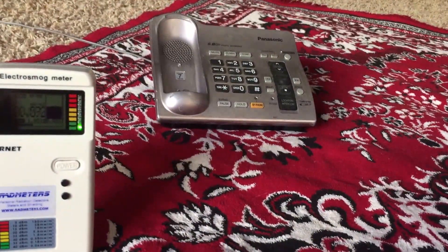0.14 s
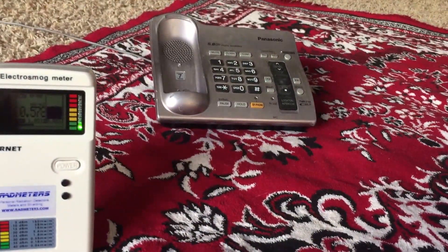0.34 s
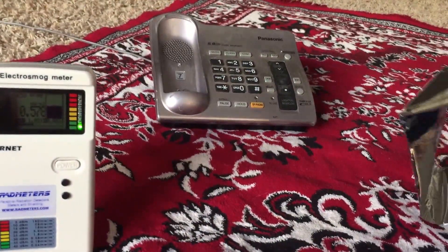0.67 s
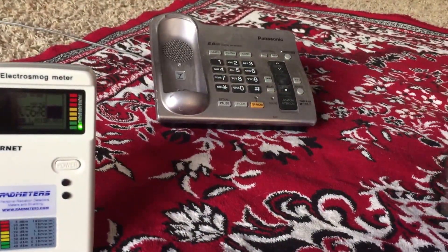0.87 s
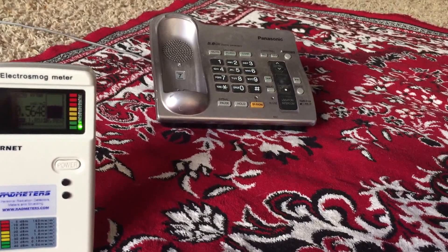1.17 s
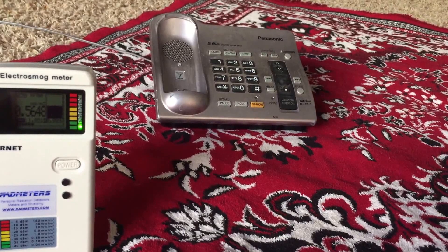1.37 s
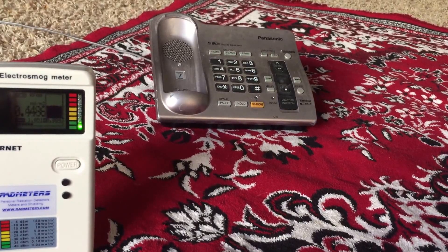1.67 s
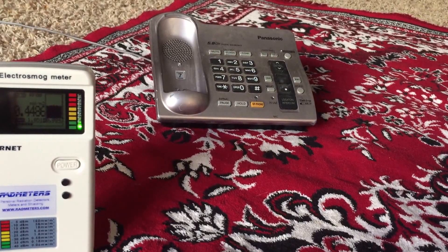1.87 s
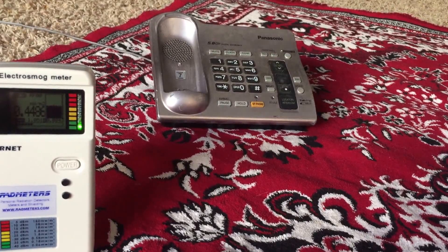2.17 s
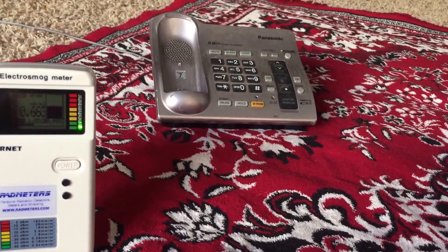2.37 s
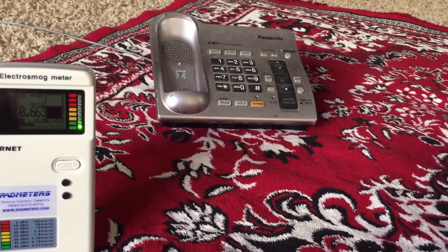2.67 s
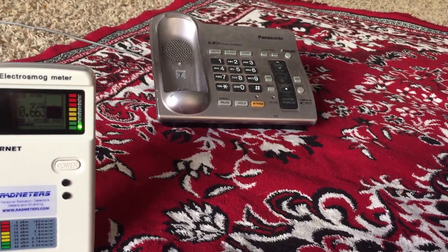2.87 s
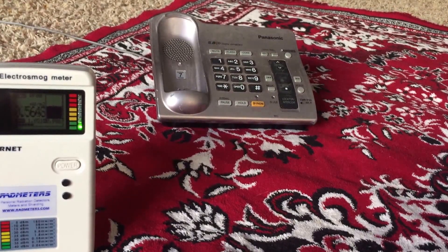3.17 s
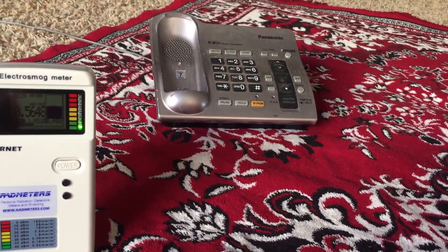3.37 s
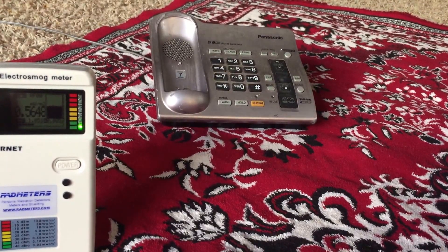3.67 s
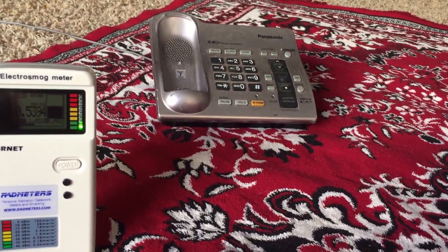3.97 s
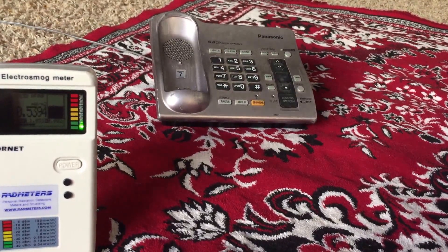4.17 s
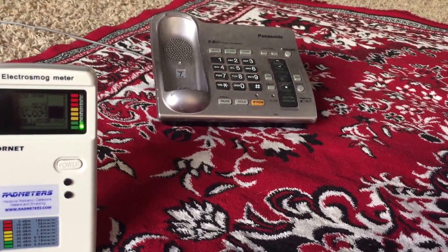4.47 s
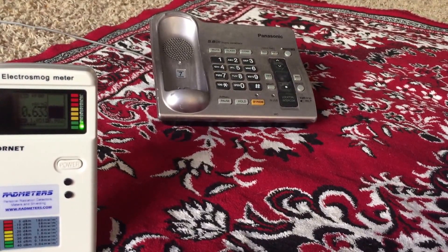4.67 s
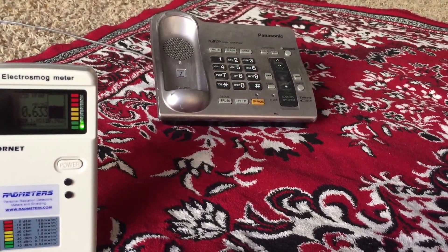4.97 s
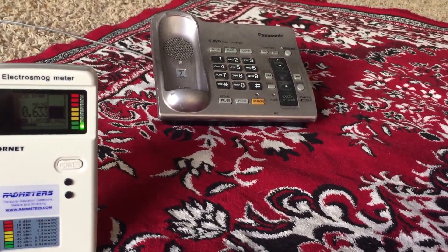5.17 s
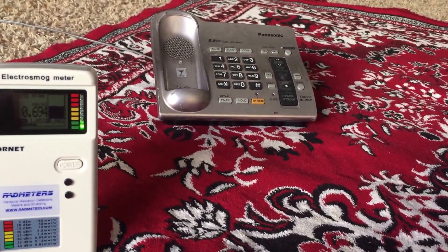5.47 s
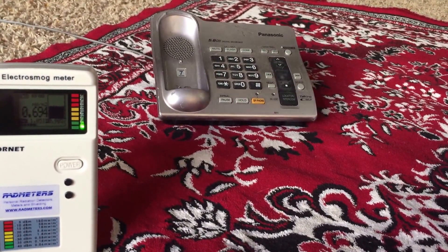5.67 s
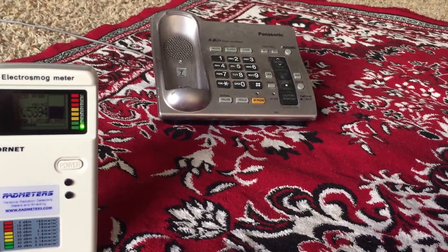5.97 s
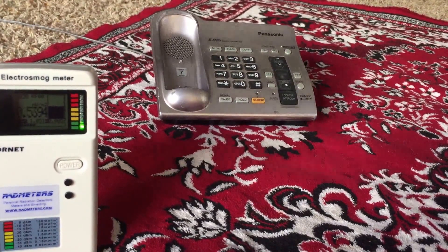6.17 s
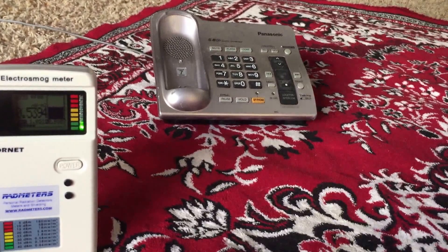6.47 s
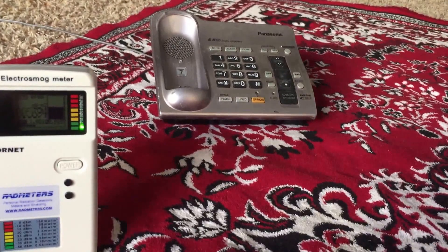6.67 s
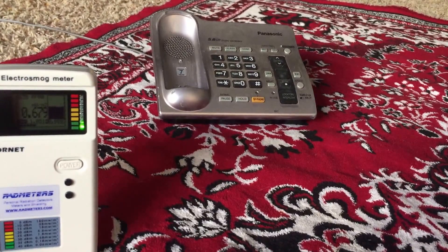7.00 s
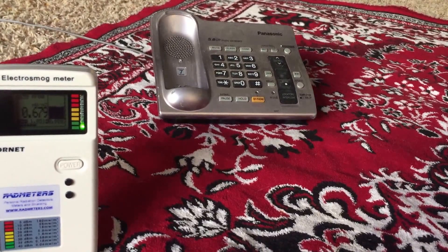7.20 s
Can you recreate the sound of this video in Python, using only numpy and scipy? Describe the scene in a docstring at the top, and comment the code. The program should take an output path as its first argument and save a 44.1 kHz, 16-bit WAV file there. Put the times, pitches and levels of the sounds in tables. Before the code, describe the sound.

Crisp, dry crackle from a foil-like plastic blanket being spread out nearby. Thousands of tiny clicks mix low fold pops, sharp mid-pitched crease snaps and fine high wrinkle fizz. Handling starts sparse, surges at about one second, peaks past the middle and late, and never fully stops. Low flutters of air and dull soft thumps lie beneath, in a small indoor room with faint hum and hiss.

```python
"""A thin metallised plastic blanket is unfolded by hand in a carpeted room, beside a small microphone.
It starts with light, bright rustling and single snaps, then the tugs come in stronger swells.
Thousands of tiny bursts make the crackle: wide folds click low, creases near 2 kHz, fine wrinkles high.
The handling is loudest near 3.6 s and 6 s; soft low thumps follow just before 6 s and 7 s.
All along, the sheet swings, wobbles low and pushes air, over a faint room hum and hiss of filtered noise."""
import sys
import numpy as np
from scipy import signal
from scipy.fft import rfft, irfft, next_fast_len
from scipy.io import wavfile
from scipy.ndimage import uniform_filter1d, map_coordinates

SR = 44100
rng = np.random.default_rng(int(sys.argv[2]) if len(sys.argv) > 2 else 0)


def boost(x):
    """Linear amplitude factor 10**(x/20) for a level x in decibels (scalar or array-like)."""
    u = np.asarray(x, float) / 20
    return 10 ** u


def inscribe(sig):
    """Save sig as 16-bit PCM at rate SR to the path in sys.argv[1].

    A 1-D sig is mono; a 2-D sig holds one channel per row.
    Samples are clipped to [-1, 1] before scaling.
    """
    pcm = np.round(np.clip(np.atleast_2d(sig).T, -1, 1) * 32767)
    wavfile.write(sys.argv[1], SR, pcm.astype(np.int16))


N = 323694  # length in samples, about 7.3 s


def along(points, hz):
    """Reads a curve of (pitch_hz, value) points, with pitch on a log axis."""
    point_hz, value = np.transpose(points)
    return np.interp(np.log(hz + 1), np.log(point_hz + 1), value)


def unit(x):
    """Scales a sound to an rms level of 1."""
    return x / np.sqrt(np.mean(x ** 2, -1, keepdims=True) + 1e-20)


def curves(rows):
    """Joins table rows by straight lines: one value per sample for each column after the time."""
    time_s, *columns = np.transpose(rows)
    return [np.interp(np.arange(N) / SR, time_s, column) for column in columns]


def wobble(rate):
    """A smooth random curve through rate random values a second (at most 400)."""
    return map_coordinates(rng.standard_normal(N // 100), [np.arange(N) * min(rate, 400) / SR])


def filtered(x, response):
    """Multiplies the spectrum of x by a gain that depends on frequency."""
    size = next_fast_len(N + SR // 2)
    gain = response(np.fft.rfftfreq(size, 1 / SR))
    return irfft(rfft(x, size) * gain, size)[..., :N]


def above(f, hz):
    """Gain of a steep high-pass filter."""
    return 1 / np.sqrt(1 + (hz / (f + 1)) ** 8)


def pops(start_s, hz, energy_db, t60_s, sharpness, size):
    """Short noise bursts that swell and die, each through its own resonance (sharpness = pitch / width)."""
    t = np.arange(size) / SR
    f = np.fft.rfftfreq(size, 1 / SR)
    age = t / t60_s[:, None]
    burst = rng.standard_normal((len(start_s), size)) * boost(-60 * age)
    burst *= t < t[size // 2]  # the second half is left free for the ringing
    burst *= 1 - np.exp(-age / .04)  # a quick but soft start
    centre = hz[:, None]
    ring = 1j * f * centre / (centre * centre - f * f + 1j * f * centre / sharpness)
    pop = irfft(rfft(burst) * ring, size)
    pop *= boost(energy_db)[:, None] / np.linalg.norm(pop, axis=1, keepdims=True)
    where = np.round(start_s * SR).astype(int)[:, None] + np.arange(size)
    return np.bincount(where.ravel(), pop.ravel(), N + size)[:N]


def crackle(count, low_hz, high_hz, spread_db, most_db, t60_s, sharpness, size):
    """Film buckles at random moments and pitches; few bursts come near most_db (below 0 if spread_db is)."""
    when, pitch, big, life = rng.random((count, 4)).T
    hz = low_hz * (high_hz / low_hz) ** pitch
    energy_db = most_db * np.tanh(-spread_db * np.log(1 - big) / most_db)
    x = pops(when * (N - 1) / SR, hz, energy_db, t60_s * (.5 + life), sharpness, size)
    return unit(filtered(x, np.sqrt))  # pitches spread evenly per octave, levelled per Hz


def bursts(top_s, db, rise_ms, fall_ms):
    """Summed power of swells that are 10 dB down rise_ms before and fall_ms after their top."""
    coarse = np.arange(0, N, 32)  # worked out at every 32nd sample
    late_ms = 1000 * (coarse / SR - top_s[:, None])
    span_ms = np.where(late_ms < 0, rise_ms[:, None], fall_ms[:, None])
    away = np.abs(late_ms) / np.maximum(span_ms, 8)
    level_db = db[:, None] - 10 * away ** 1.5  # rounded top, steepening flanks
    power = np.sum(boost(level_db) ** 2, 0)
    return np.interp(np.arange(N), coarse, power)


def blanket():
    """Film buckles in clumps of crackle over a sliding hiss; folds, creases and wrinkles take their turns."""
    # colour of the crackle at the microphone: pitch_hz, level_db (per Hz, relative)
    foil_colour = [(250, -22), (420, -10.5), (503, -17), (918, -5.5), (1510, -7.5), (2070, -4.5),
                   (2300, -3), (2550, -3.5), (4880, -6.5), (5500, -5), (8900, -7), (10500, -8),
                   (13800, -10.5), (15300, -11.5)]
    # a narrow rustle that stands out when the handling is light: time_s, level_db (over creases)
    narrow_level = [(0, -9), (.6, -2.5), (1.8, -7), (2.4, -14), (2.65, 0.5), (2.95, -1), (3.2, -11.5),
                    (4.1, -12.5), (5.1, -22), (6, -8), (7.34, -13)]
    fold_top_hz, wrinkle_low_hz = 1600, 3600  # borders between folds, creases and wrinkles
    narrow_hz, narrow_width_hz = 1988, 270

    bright_gain, wide_gain, wrinkle_db = effort()
    wrinkle_db = wrinkle_db + 0.15 * wobble(8.9)  # the balance of sizes never rests
    clumps_db = 0.47 * wobble(22) + 0.95 * wobble(70)

    ticks = crackle(count=1800, low_hz=1000, high_hz=14200, spread_db=1.2, most_db=8,
                    t60_s=0.005, sharpness=0.4, size=256)
    big = crackle(count=7000, low_hz=447, high_hz=4310, spread_db=.9, most_db=7,
                  t60_s=0.012, sharpness=1.8, size=512)
    big += boost(-4) * rng.standard_normal(N) + boost(-1) * ticks  # noise: the sliding hiss
    small = crackle(count=14000, low_hz=3080, high_hz=16400, spread_db=.8, most_db=5,
                    t60_s=0.006, sharpness=1.9, size=256)
    small += boost(-1) * rng.standard_normal(N) + boost(-1) * ticks

    def band(x, low_hz, high_hz):
        """One range of pitches in the colour of the film."""
        def response(f):
            below = np.sqrt(1 - above(f, high_hz) ** 2)
            return boost(along(foil_colour, f)) * above(f, low_hz) * below
        return filtered(x, response)

    folds = unit(band(big, 1, fold_top_hz) * boost(clumps_db + 1.35 * wobble(40)))
    creases = unit(band(big, fold_top_hz, wrinkle_low_hz) * boost(clumps_db + .5 * wobble(30)))
    wrinkles = unit(band(small, wrinkle_low_hz, SR) * boost(clumps_db + 0.27 * wobble(27)))
    narrow_db, = curves(narrow_level)
    narrow = unit(filtered(small, lambda f: 1 / (1 + (2 * (f - narrow_hz) / narrow_width_hz) ** 2)))

    bright = creases + boost(narrow_db) * narrow + boost(wrinkle_db) * wrinkles
    share = np.sqrt(1 + boost(wrinkle_db) ** 2)  # creases and wrinkles divide the effort between them
    return (bright_gain * bright + wide_gain * folds) / share


def effort():
    """Harder handling buckles more film: gains of creases with wrinkles and of folds, and wrinkle dB."""
    # steady handling: time_s, crackle_db, wide_folds_db (over creases), fine_wrinkles_db (over creases)
    steady_hands = [(0.0, -50.5, -4, 10), (0.11, -55, -10, 5.5), (0.15, -70.5, -7, -1), (0.36, -67, -11, 4),
                    (0.46, -59, 7.5, 4.5), (0.66, -65, -10, 3.5), (1.05, -58, 1, 4),
                    (1.45, -51.5, -10, 4.5), (1.9, -51.5, -12, 3.5), (2.19, -51, -5, 4.5),
                    (2.55, -51.5, -12, 5.5), (2.67, -63, -16, 6), (2.96, -57.5, -16, 5.5),
                    (3.02, -52, -1, 7), (3.38, -46, -6, 1.5), (3.5, -37.5, -7, 6), (4.07, -44, -17, 4.5),
                    (4.27, -47, -24, 3.5), (4.57, -54.5, -10, 3.5), (5.3, -48.5, -7, 2.5),
                    (5.7, -47, -8, 6), (6.2, -53, -7, 5.5), (6.46, -52.5, -8, 5), (6.92, -55, -8, 6.5),
                    (7.34, -53, -5, 3.5)]
    # single tugs, each a burst of crumpling that builds up and lets go:
    # top_s, crackle_db, rise_ms (the last 10 dB), fall_ms (the first 10 dB), wide_folds_db (over creases)
    tugs = [(0.315, -61.5, 50, 20, -8), (0.387, -54.5, 63, 10, -7), (0.447, -49, 66, 277, -11),
            (0.583, -49, 84, 16, -1.5), (0.694, -54.5, 14, 99, -3), (0.78, -45.5, 23, 44, -3.5),
            (0.885, -44, 51, 246, -6.5), (0.985, -34.5, 100, 21, -9.5), (1.24, -43.5, 116, 98, -4),
            (1.345, -47, 50, 150, 1), (1.626, -46.5, 169.5, 47, -1.5), (1.721, -47, 11, 18, -3),
            (1.86, -47, 200, 132, -3.5), (2.035, -38, 98, 65, -1), (2.326, -41, 91, 85, -2),
            (2.454, -43.5, 22, 34, -9), (2.594, -49, 15, 47, -4.5), (2.727, -47, 82, 47, -8.5),
            (2.82, -49, 33, 64, -7), (2.97, -56.5, 57, 307, -4), (3.076, -44.5, 65, 77, -16),
            (3.317, -42, 220, 29, -4), (3.532, -41.5, 10, 16, 3.5), (3.628, -32, 65, 159, -6),
            (3.957, -37.5, 233, 113, -3), (4.214, -42, 403, 31, -9), (4.397, -41, 117, 60, -6.5),
            (4.53, -53, 105, 16, -2), (4.638, -47.5, 49, 44, -14), (4.714, -41.5, 34, 71, -11),
            (4.791, -44.5, 37, 193, -8.5), (5.009, -46.5, 96, 33, -3.5), (5.097, -48.5, 24, 400, -19.5),
            (5.205, -47, 26, 22, -15), (5.372, -38, 37, 52, -10), (5.555, -41.5, 163, 36, -7.5),
            (5.623, -40, 29, 54, 0.5), (5.887, -34, 330, 45, -11), (6.005, -33, 219, 46, -3.5),
            (6.179, -38, 296, 40, -3), (6.22, -42.5, 254, 270, -4), (6.403, -38, 28, 21, 2),
            (6.544, -47, 26, 148, -3.5), (6.609, -41, 15, 29, -10), (6.711, -45, 94, 163, -8),
            (6.968, -40, 18, 190, -12), (7.149, -43, 73, 74, -5), (7.289, -45.5, 105, 100, -7)]
    steady_db, fold_db, wrinkle_db = curves(steady_hands)
    top_s, tug_db, rise_ms, fall_ms, tug_fold_db = np.transpose(tugs)
    bright_power = boost(steady_db) ** 2 + bursts(top_s, tug_db, rise_ms, fall_ms)
    wide_power = boost(steady_db + fold_db) ** 2 + bursts(top_s, tug_db + tug_fold_db, rise_ms, fall_ms)
    return np.sqrt(bright_power), np.sqrt(wide_power), wrinkle_db


def patchy(x, depth_db, bins, frames):
    """The colour drifts in patches of pitch and time as other parts of the sheet are handled."""
    spectrum = signal.stft(x, nperseg=512)[2]
    field = rng.standard_normal(spectrum.shape)
    field = uniform_filter1d(uniform_filter1d(field, bins, 0), frames, 1)
    return signal.istft(spectrum * boost(depth_db * field / field.std()), nperseg=512)[1][:N]


def snaps():
    """A big crease pops over: a short ring of the fold and a bright spray from the wrinkles around it."""
    # single snaps that stand out: start_s, ring_hz, ring_energy_db, spray_hz, spray_energy_db
    snap_list = [(.105, 2500, -29, 11000, -26), (.231, 2500, -51, 6000, -33), (.25, 2650, -29, 12100, -28),
                 (.302, 2580, -30.5, 9050, -33), (.383, 1660, -23, 8950, -22),
                 (0.418, 2800, -39, 6400, -22), (.438, 2550, -24, 6200, -24), (0.542, 1740, -22, 9310, -25),
                 (.577, 1730, -9.5, 4090, -34), (0.585, 1870, -16, 4500, -38),
                 (.704, 1750, -22.5, 6070, -35), (0.778, 1980, -22, 4480, -21),
                 (.856, 2090, -28.5, 7990, -23), (.939, 1980, -15, 5450, -18), (.953, 1990, -14, 5000, -24),
                 (.961, 1900, -10.5, 4500, -24), (.979, 2110, -13, 5500, -27), (.991, 2200, -16, 6500, -19),
                 (1.0, 2000, -27, 4500, -31), (1.172, 1900, -24, 4500, -28), (1.238, 1400, -17, 5000, -28),
                 (2.119, 2000, -26, 5000, -27), (1.995, 2000, -18, 5000, -19),
                 (2.018, 2030, -18, 5000, -21), (2.032, 1980, -19, 5000, -17),
                 (2.049, 1800, -23, 5000, -27), (2.058, 1050, -15.5, 4500, -26),
                 (3.631, 2000, -13, 4300, -14), (3.639, 2110, -12, 4500, -16),
                 (3.675, 2020, -15, 4500, -22), (3.769, 2150, -25, 4000, -24),
                 (3.908, 2080, -12.5, 5000, -22), (3.935, 2900, -15, 4500, -24),
                 (6.022, 2300, -13, 5000, -24), (1.067, 2970, -24, 5500, -13),
                 (1.211, 2010, -37, 7090, -13), (1.297, 2090, -15, 4420, -32),
                 (1.412, 2040, -20.5, 8550, -20), (1.584, 1200, -17, 4450, -23.5),
                 (1.613, 2670, -15.5, 6550, -26), (1.727, 2500, -29, 5650, -25),
                 (1.717, 1880, -33, 5600, -17), (1.79, 3180, -17, 6430, -28), (1.835, 1880, -16, 4580, -35),
                 (2.308, 3440, -13, 8810, -21), (2.326, 2400, -14, 5000, -35),
                 (2.722, 2020, -29, 5670, -24), (3.071, 3480, -30, 8000, -15),
                 (3.106, 2900, -21, 5840, -26), (3.192, 1980, -20, 8900, -4.5),
                 (3.223, 2000, -28, 5670, -25), (3.315, 2050, -16, 7000, -14),
                 (3.371, 2010, -22, 6140, -26), (3.523, 1240, -23, 5800, -18),
                 (3.564, 2990, -25, 5100, -17), (3.582, 1780, -13, 6180, -23),
                 (4.203, 2930, -14, 5180, -31), (4.386, 2480, -13.5, 4080, -30),
                 (4.516, 3000, -33, 5500, -21), (4.693, 1350, -26, 5880, -21),
                 (5.358, 2240, -13, 6000, -24), (5.618, 2470, -15, 4230, -18), (5.986, 1950, -5, 5910, -22),
                 (5.996, 2980, -20, 5000, -21), (6.113, 2020, -11.5, 5500, -14),
                 (6.178, 2500, -11, 8000, -10), (6.163, 2500, -17, 13200, -14),
                 (6.244, 1740, -12.5, 6290, -23), (6.299, 2030, -19, 5210, -32),
                 (6.381, 1070, -22, 4050, -25), (6.41, 2200, -17, 3600, -19), (6.441, 1910, -21, 5560, -20),
                 (6.529, 1360, -23.5, 8570, -24), (6.598, 1900, -20, 8850, -16),
                 (6.623, 2200, -20, 6000, -20), (6.72, 2290, -28, 11200, -17), (6.95, 3090, -20, 5410, -30),
                 (7.276, 2820, -21, 5730, -17)]
    start_s, ring_hz, ring_db, spray_hz, spray_db = np.transpose(snap_list)
    even = np.ones(len(start_s))
    ring = pops(start_s, ring_hz, ring_db, .016 * even, sharpness=3.2, size=1024)
    spray = pops(start_s, spray_hz, spray_db, .008 * even, sharpness=1.1, size=1024)
    return ring + spray


def flapping():
    """Broad areas of film push air and wobble at low pitches for a few cycles."""
    # big swings of the whole sheet: top_s, air_push_db, film_wobble_db, span_ms (for 10 dB up and down)
    swings = [(0.11, -66.5, -69, 47), (0.58, -61, -65, 62), (0.79, -64, -81, 59), (0.94, -68, -55, 77),
              (1.26, -71.5, -87, 222), (1.5, -69, -62, 50), (2.05, -75, -63, 32), (2.45, -75, -65.5, 120),
              (3.27, -71, -67, 300), (3.54, -69, -58.0, 52), (3.76, -74, -56, 250), (4.2, -78.5, -56.5, 25),
              (4.34, -73, -69, 300), (4.99, -64, -65, 50), (5.44, -68, -71, 204), (5.95, -64, -51, 202),
              (6.38, -74, -58.5, 201), (6.78, -68, -59, 80), (7.0, -69, -60, 63), (7.15, -75, -62, 150)]
    # colour of pushes and wobbles: pitch_hz, level_db (per Hz, relative)
    flap_colour = [(16, -44), (28, -21), (54, -7), (102, 1.5), (308, -2), (337, -4), (495, -19.5),
                   (600, -12.5), (780, -28), (1320, -120)]
    push_db, push_waver_db = -72, 4  # the air stirs a little all the time
    wobble_db, wobble_waver_db = -69, 1.5  # film wobble at ordinary effort
    ordinary_db = -45  # crackle of ordinary effort
    growth = 0.76  # dB of wobble for each dB of effort

    top_s, swing_push_db, swing_wobble_db, span_ms = np.transpose(swings)
    relative_effort = effort()[0] / boost(ordinary_db)
    follow = boost(wobble_db + wobble_waver_db * wobble(9)) * relative_effort ** growth
    stir = boost(push_db + push_waver_db * wobble(5))
    push_gain = np.sqrt(stir ** 2 + bursts(top_s, swing_push_db, span_ms, span_ms))
    wobble_gain = np.sqrt(follow ** 2 + bursts(top_s, swing_wobble_db, span_ms, span_ms))

    def colour(f):
        return boost(along(flap_colour, f))

    def deep(f):
        return 1 / np.sqrt(1 + (f / 88) ** 6)  # air pushes lie below about 88 Hz, wobbles above

    # low bursts of nearly equal size
    film = crackle(count=900, low_hz=33.74, high_hz=615, spread_db=-1.0, most_db=1.0,
                   t60_s=0.094, sharpness=11.7, size=8192)
    film += boost(1.0) * rng.standard_normal(N)
    pushes = unit(filtered(film, lambda f: colour(f) * deep(f)))
    wobbles = unit(filtered(film, lambda f: colour(f) * np.sqrt(1 - deep(f) ** 2)))
    return push_gain * pushes + wobble_gain * wobbles


def thuds():
    """A soft contact: a few cycles of one low resonance."""
    # dull low thumps: start_s, pitch_hz, energy_db
    thump_list = [(5.86, 65, -19), (5.96, 90, -23), (6.76, 60, -22), (6.83, 60, -21)]
    start_s, hz, energy_db = np.transpose(thump_list)
    return pops(start_s, hz, energy_db, .03 * np.ones(len(start_s)), sharpness=3, size=8192)


def bounce(x):
    """One early reflection, duller than the direct sound; its delay follows the sheet."""
    # a hard surface close by answers as the sheet moves: time_s, delay_ms, level_db
    reflection = [(0, 1.14, -13.5), (2.3, 1.08, -12.5), (3.0, 1.01, -13.5), (3.8, 1.03, -18),
                  (4.4, .95, -22), (5.9, 0.876, -19.5), (6.6, 0.77, -19), (7.34, 0.69, -16)]
    delay_ms, level_db = curves(reflection)
    dull = filtered(x, lambda f: 1 / np.sqrt(1 + (f / 7000) ** 4))
    return boost(level_db) * map_coordinates(dull, [np.arange(N) - delay_ms * SR / 1000])


def room(x, count):
    """Each frequency dies at its own speed; the answer changes as the sheet moves about the room."""
    # how long the room rings: pitch_hz, t60_s (time to fall by 60 dB)
    ringing = [(500, 0.082), (3000, 0.19), (12000, 0.63)]
    hz, t, noise = signal.stft(rng.standard_normal((count, SR // 3)), SR, nperseg=256)
    decay = boost(-60 * t / along(ringing, hz)[:, None])
    tails = signal.istft(noise * decay, SR, nperseg=256)[1]
    wet = np.zeros(N + SR)
    for piece, tail in zip(np.array_split(np.arange(N), count), tails):
        answer = signal.fftconvolve(x[piece], tail / np.linalg.norm(tail))
        wet[piece[0] + 200:][:len(answer)] += answer  # the first wall answers after about 4.5 ms
    return wet[:N]


def room_hum():
    """Noise in narrow low bands makes an unsteady hum."""
    # the bands of the hum: pitch_hz, width_hz, level_db (relative)
    hum_bands = [(94.4, 4.8, 0), (115.3, 7.8, -13), (193, 19, 2.5)]

    def response(f):
        return sum(boost(db) / (1 + (2 * (f - hz) / width_hz) ** 2) for hz, width_hz, db in hum_bands)
    return boost(-75.0) * unit(filtered(rng.standard_normal(N), response))


def air_hiss():
    """Air in the room: steady noise with a fixed colour."""
    # colour of the air: pitch_hz, level_db (per Hz, relative)
    air_colour = [(250, -28), (450, -1), (900, -8), (2000, -10), (4000, -27), (15000, -12)]
    noise = rng.standard_normal(N)
    return boost(-76.5) * unit(filtered(noise, lambda f: boost(along(air_colour, f))))


def scene():
    """The blanket near the microphone, with one close reflection, a little room and faint hum and hiss."""
    foil = patchy(blanket(), depth_db=1.0, bins=9, frames=12) + snaps()
    echoes = bounce(foil) + boost(-9.5) * room(foil, count=30)
    mix = foil + echoes + flapping() + thuds() + room_hum() + air_hiss()
    return mix[None]  # one channel


def low_pass(x):
    """Removes everything above the highest recorded frequency."""
    return signal.sosfilt(signal.butter(12, 16510, fs=SR, output="sos"), x)


def record(dry):
    """The microphone housing weakens three narrow bands, and the very top is cut."""
    # dips of the microphone housing: pitch_hz, width_hz, level_db
    housing_dips = [(1980, 87, -1), (4930, 60, -2.5), (10480, 240, -13)]
    top_hz = 15480

    def housing(f):
        return boost(sum(db / (1 + (2 * (f - hz) / width_hz) ** 2) for hz, width_hz, db in housing_dips))

    def top(f):
        return np.clip((top_hz - f) / 150, .002, 1)  # fades out over the last 150 Hz

    mix = filtered(dry, lambda f: housing(f) * top(f))
    return low_pass(mix)


dry = scene()
out = record(dry)
inscribe(out)
```